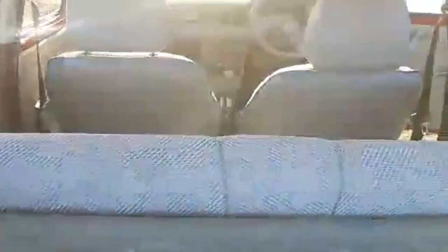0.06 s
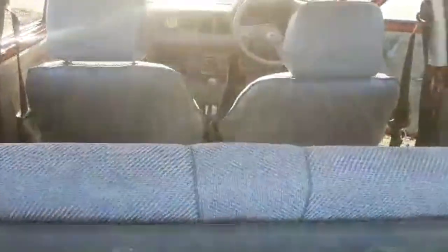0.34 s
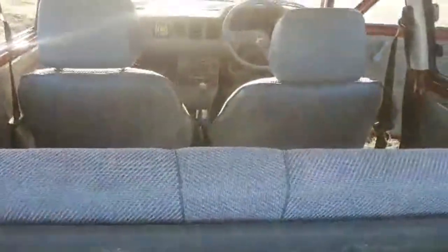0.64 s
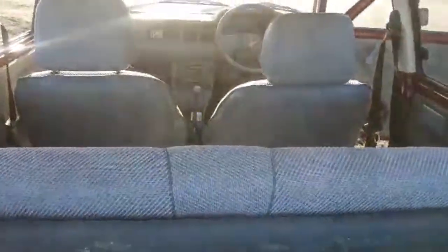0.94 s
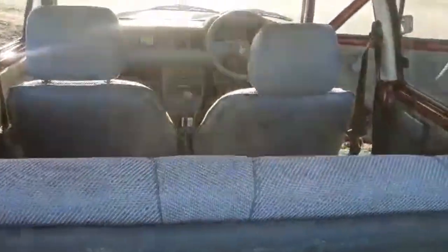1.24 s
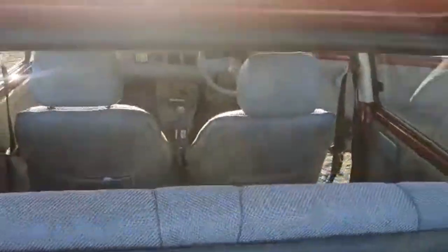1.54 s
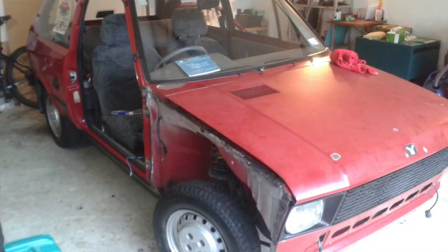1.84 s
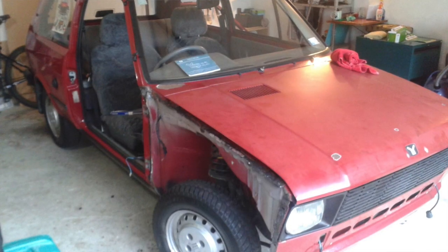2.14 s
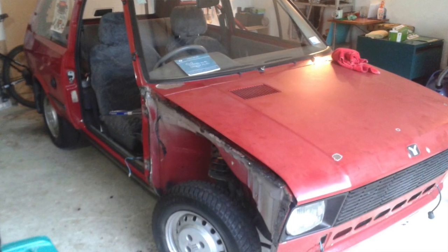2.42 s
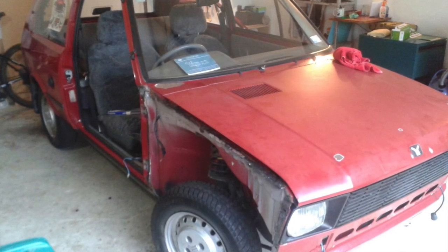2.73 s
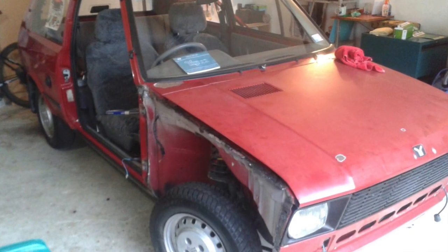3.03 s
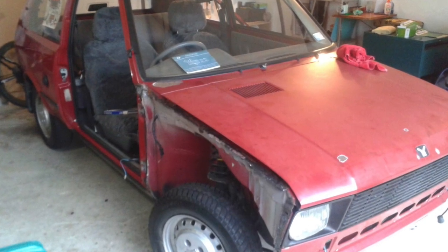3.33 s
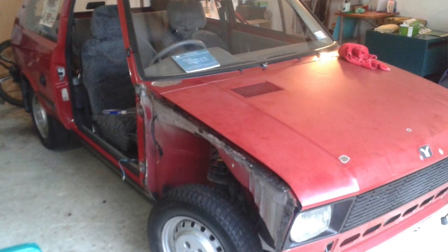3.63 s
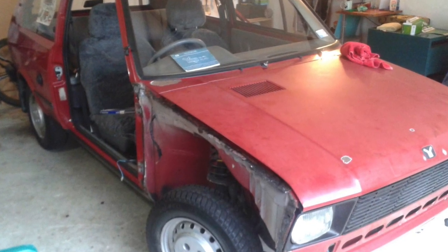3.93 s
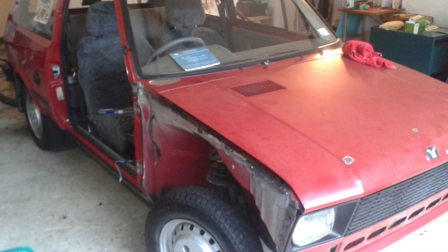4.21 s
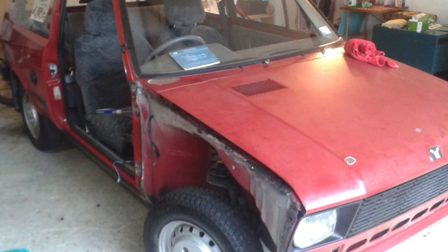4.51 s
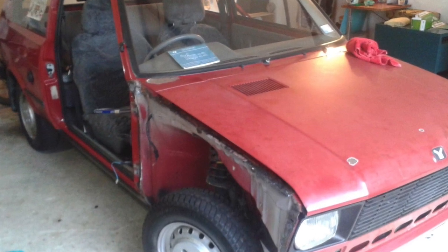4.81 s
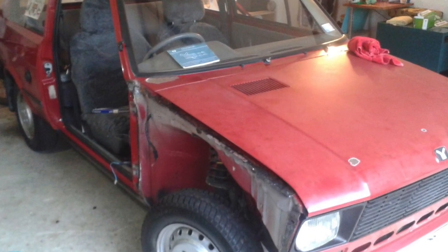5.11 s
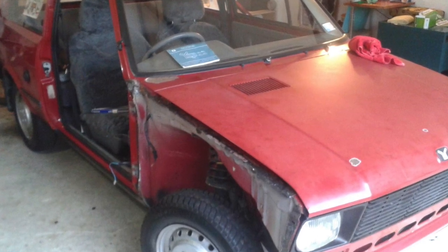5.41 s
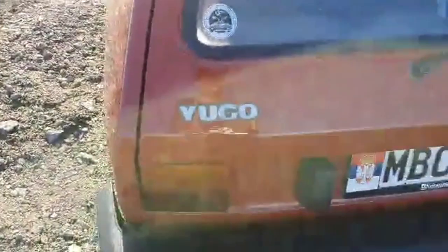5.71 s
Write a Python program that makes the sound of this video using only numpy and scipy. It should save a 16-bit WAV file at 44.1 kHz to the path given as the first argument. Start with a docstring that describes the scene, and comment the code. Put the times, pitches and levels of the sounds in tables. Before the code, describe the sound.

Wind rumbles low on a close hand-held microphone outdoors. Clothes rustle faintly, a finger taps the camera and a metal hinge gives a few light clicks. Shoes shift and crunch on gravel. Then a car hatch swishes down and slams with a loud, deep thump, a sharp latch clack and a quick rattle. Afterwards the wind is quieter, with a few small handling ticks.

```python
"""Hatchback tailgate slammed on gravel

Wind rumbles on a hand-held camera's microphone. Clothes rustle, fittings tick, a finger taps the camera,
the hinge clicks and shoes shift on the grit. The hatch swishes down, the latch strikes, the lid lands
on its seal, the cabin booms and the hatch chatters three times against the catch.
The blow ducks the automatic gain, so the wind is quieter afterwards."""
import sys
import numpy as np
from scipy import signal
from scipy.fft import rfft, irfft, next_fast_len
from scipy.io import wavfile
from scipy.ndimage import uniform_filter1d

SR = 44100
rng = np.random.default_rng(int(sys.argv[2]) if len(sys.argv) > 2 else 0)


def waveform_to_disk(signal):
    """Save audio, clipped to [-1, 1], as 16-bit WAV at the path in sys.argv[1]."""
    frames = np.transpose(np.atleast_2d(signal))
    scaled = np.clip(frames, -1, 1) * 32767
    samples = np.round(scaled).astype(np.int16)
    wavfile.write(sys.argv[1], SR, samples)


N = 253843
TIME = np.arange(N) / SR
SWING_START_S, SWING_END_S = 3.88, 4.33   # the hatch falls between these times

# stereo image, mono in the bass and wide on top: (frequency [Hz], left-right correlation [0..1])
STEREO_LIKENESS = [(60, 1), (200, 0.97), (370, .8), (670, 0.42), (1300, 0.095), (2800, .02), (13000, 0.034)]
# tone of rubbing cloth: (frequency [Hz], level [dB])
CLOTH_COLOUR = [(290, -35.5), (500, -3), (622, -5), (904, -6), (1170, -8), (1260, -6.5), (1990, -6.5),
                (3180, -18.5), (6000, -21.5), (7800, -57), (13200, -120)]
# tone of small hard parts: (frequency [Hz], level [dB])
FITTING_COLOUR = [(120, -46), (200, -1), (527, -5), (711, 3), (1440, 6.5), (1840, -5), (2490, 9),
                  (4140, -12), (5900, -11), (6550, -26), (7680, -19), (8540, -29), (9830, -9), (12400, -3),
                  (13500, -20)]
# tone of a struck shell, car or camera body: (frequency [Hz], level [dB])
BODY_COLOUR = [(140, -29), (230, 0.5), (287, -6), (425, -9), (479, -12.5), (673, -7), (979, -12.5),
               (1120, -12), (1500, -20.5), (2720, -21.5), (3120, -27), (5290, -29), (9440, -38.5),
               (12400, -37), (13500, -46.5)]


def from_db(db):
    """Decibels to gain."""
    return 10 ** (np.asarray(db) / 20)


def unit_rms(x):
    """Scale to unit power."""
    return x / np.sqrt(np.mean(x ** 2) + 1e-20)


def at_hz(curve, hz):
    """Read a curve on a log-frequency axis."""
    knots_hz, values = np.transpose(curve)
    return np.interp(np.log(hz), np.log(knots_hz), values)


def panned(left_db):
    """Stereo gains with the left side this much louder than the right."""
    return from_db(np.array([[left_db], [-left_db]]) / 2)


def noise(colour, low_hz, high_hz, grain_db=0, resonances=(), resonant_db=0):
    """A band of coloured stereo noise, roughened into sub-millisecond grains, with optional resonances."""
    size = next_fast_len(N, True)
    grains = np.repeat(rng.standard_normal(size // 32 + 1).clip(-2.5, 2.5), 32)[:size]
    mid, side = rfft(rng.standard_normal((2, size)) * from_db(grain_db * grains))
    hz = np.maximum(np.arange(len(mid)) * SR / size, 1)
    band = 1 / np.sqrt((1 + (low_hz / hz) ** 10) * (1 + (hz / high_hz) ** 10))
    peaks = np.zeros(len(hz))
    for centre, width, db in resonances:
        peaks += from_db(2 * db) / (1 + (2 * (hz - centre) / width) ** 2)
    broad = unit_rms(band * from_db(at_hz(colour, hz)))
    resonant = from_db(resonant_db) * unit_rms(band * np.sqrt(peaks))
    alike = at_hz(STEREO_LIKENESS, hz)
    stereo = np.sqrt(1 + alike) * mid + np.sqrt(1 - alike) * side * [[1], [-1]]
    return unit_rms(irfft(np.hypot(broad, resonant) * stereo, size)[:, :N])


def ring(force, hz, t60):
    """One mode: a unit click starts a decaying sine of height 1."""
    radius, angle = from_db(-60 / (t60 * SR)), 2 * np.pi * hz / SR
    return signal.lfilter([0, np.sin(angle)], [1, -2 * radius * np.cos(angle), radius ** 2], force + 1e-18)


def bursts(times, level_db, t60, texture, rise_s, tail_db, tail_t60):
    """Shape a noise texture into hits: quick attack, main decay and a weaker tail."""
    power, t = np.zeros(N), TIME[:SR]
    for start, db, hit_t60 in np.broadcast(times, level_db, t60):
        at = round(start * SR)
        attack = 1 - np.exp(-(t / rise_s) ** 2)
        decay = from_db(-120 * t / hit_t60) + from_db(2 * tail_db - 120 * t / tail_t60)
        power[at:at + SR] += (attack * decay * from_db(db) ** 2)[:N - at]
    return np.sqrt(power) * texture


def clink(times, level_db, modes):
    """Sharp contacts ring a small steel part; alternate modes flip polarity on the right."""
    clicks = np.zeros(N)
    clicks[np.round(times * SR).astype(int)] = from_db(level_db)
    return sum(from_db(db) * ring(clicks, hz, t60) * [[1], [0.75 * (-1) ** k]]
               for k, (hz, db, t60) in enumerate(modes))


def hatch_speed(rise_db_per_s=26, fade_s=0.04):
    """Envelope of the fall: it grows to 1 as the hatch lands, then fades quickly."""
    gate = np.clip(np.minimum(TIME - SWING_START_S, SWING_END_S + fade_s - TIME) / fade_s, 0, 1)
    return gate * from_db(rise_db_per_s * np.minimum(TIME - SWING_END_S, 0))


def wind(steady_db=-40, draught_db=-36):
    """A bed of rumble on the microphone, swelling in the draught of the falling hatch."""
    # tone of the buffeting: (frequency [Hz], level [dB])
    wind_colour = [(13, -35), (22, -9), (53, -0.5), (75, -1), (102, -7), (120, -7.5), (171, -16),
                   (264, -25.5), (484, -29.5), (900, -39.5), (1170, -70.5), (1980, -120)]
    level = np.hypot(from_db(steady_db), from_db(draught_db) * hatch_speed())
    return level * noise(wind_colour, 18, 900) * panned(-0.3)


def shuffle():
    """Cloth rubs and fine grit trickles as the person moves and pulls the hatch down."""
    # swells of movement: (peak time [s], rub level [dB], grit level [dB], rise [s], fall [s])
    rustles = [(0.02, -79, -79.5, 0.063, 0.2), (1.28, -60.5, -76.5, 0.17, 0.16),
               (1.72, -61.5, -70.5, 0.13, 0.13), (2.32, -56, -63.5, 0.12, 0.16),
               (2.88, -61, -68.5, 0.19, 0.15), (3.7, -60.5, -75.5, 0.084, 0.34),
               (4.89, -52.5, -71, 0.026, 0.12), (5.04, -54, -60, 0.054, 0.12),
               (5.55, -64.5, -72.5, .2, .25)]
    # tone of fine grit: (frequency [Hz], level [dB])
    grit_colour = [(1760, -28), (3000, -2.5), (3170, -5.5), (4780, -11.5), (6840, -7), (8860, -14),
                   (10500, -9), (12200, -6.5), (13100, -13), (13500, -26.5)]
    pull = hatch_speed()
    rub = np.hypot(from_db(-65), from_db(-52.5) * pull)   # a faint floor plus the pulling arm
    grit = np.hypot(from_db(-82.5), from_db(-65.5) * pull)
    for peak_s, rub_db, grit_db, rise_s, fall_s in rustles:
        swell = np.exp(-0.5 * ((TIME - peak_s) / np.where(TIME < peak_s, rise_s, fall_s)) ** 2)
        rub = np.hypot(rub, from_db(rub_db) * swell)
        grit = np.hypot(grit, from_db(grit_db) * swell)
    rubbing = from_db(-0.86) * rub * noise(CLOTH_COLOUR, 650, 4460, grain_db=2)
    trickle = grit * noise(grit_colour, 3800, 17000, grain_db=2.5)
    return (rubbing + trickle + crackle(rub)) * panned(0.77)


def crackle(rub, per_second=9, t60=0.022):
    """Folds and grains catch at random, louder when the rubbing is stronger."""
    gaps, sizes = rng.standard_exponential((80, 2)).T
    times = np.cumsum(gaps) / per_second
    heard = times < TIME[-2]
    rub_db = 20 * np.log10(np.interp(times, TIME, rub))
    db = rub_db + 3 + 1.4 * np.minimum(sizes, 2)
    crisp = noise(CLOTH_COLOUR, 800, 6000, grain_db=3)
    return bursts(times[heard], db[heard], t60, crisp, rise_s=0.0013, tail_db=-14.5, tail_t60=0.08)


def fittings():
    """Small hard parts tick and rattle under the hand: knock, clack and ping with a snap on top."""
    # handling ticks: (time [s], base level [dB], brightness [dB], base t60 [s])
    ticks = [(0.644, -53, -20, 0.15), (1.192, -60, -8, 0.049), (1.248, -58.5, -3.5, 0.041),
             (1.618, -57.5, -6.5, 0.18), (1.743, -52.5, -13.5, 0.043), (4.884, -40.5, -23, 0.044),
             (4.985, -47, -17, .06), (5.101, -53.5, 14, 0.027), (5.12, -42, 5.5, 0.03),
             (5.132, -43.5, 3.5, 0.14), (5.167, -39.5, -5.5, 0.054), (5.179, -42, -13, 0.046),
             (5.609, -59, -4.5, 0.048), (5.704, -56, -11, 0.045)]
    times, db, bright_db, t60 = np.transpose(ticks)
    dull = noise(FITTING_COLOUR, 260, 580)
    hard = noise(FITTING_COLOUR, 550, 1940, grain_db=3)
    sharp = noise(FITTING_COLOUR, 3970, 9900, grain_db=5)
    narrow = noise(FITTING_COLOUR, 2500, 2500, grain_db=1)
    knock = bursts(times, db - 7, t60, dull, rise_s=0.0015, tail_db=-23, tail_t60=0.28)
    clack = bursts(times, db + 4, 1.09 * t60, hard, rise_s=0.00085, tail_db=-9.5, tail_t60=0.057)
    snap = bursts(times, db + bright_db + 5.5, t60, sharp, rise_s=0.0024, tail_db=-14.5, tail_t60=0.066)
    ping_db = db + 0.55 * bright_db - 0.5
    ping = bursts(times, ping_db, t60, narrow, rise_s=0.001, tail_db=-12, tail_t60=0.08)
    return (knock + clack + ping + snap) * panned(1.7)


def finger_tap(at_s=1.17, level_db=-37.5, t60=0.025):
    """A finger taps the camera body: one dry tick on the right."""
    shell = noise(BODY_COLOUR, 220, 5600)
    return bursts(at_s, level_db, t60, shell, rise_s=0.00079, tail_db=-32, tail_t60=0.2) * panned(-11)


def hinge():
    """The steel hinge slips and snaps as it starts to move, ringing briefly in its own resonances."""
    # hinge clicks: (time [s], base level [dB], brightness [dB])
    slips = [(1.396, -50.5, -4), (1.4134, -49, 1.5), (1.4328, -44, 8), (1.4413, -53.5, 6),
             (1.498, -55, -18), (1.557, -56.5, 10)]
    # peaks in the click noise: (frequency [Hz], width [Hz], level [dB])
    peaks = [(1930, 150, 23), (4450, 23, 4), (5140, 33, -29), (6460, 61, -3), (7500, 220, -7),
             (9360, 270, -6.5), (12200, 34, -11)]
    # partials of the clink: (frequency [Hz], level [dB], t60 [s])
    hinge_modes = [(4200, -2, 0.043), (2150, -9, 0.063), (4460, -2.5, 0.039), (10100, -7, .04),
                   (6980, -7, 0.04)]
    times, db, bright_db = np.transpose(slips)
    top_db = db + bright_db
    low = noise(FITTING_COLOUR, 2400, 2600, grain_db=-1.5, resonances=peaks, resonant_db=1)
    high = noise(FITTING_COLOUR, 5200, 16000, grain_db=1.5, resonances=peaks, resonant_db=6)
    ping = bursts(times, db + 3, t60=0.057, texture=low, rise_s=0.0012, tail_db=-13, tail_t60=0.1)
    snap = bursts(times, top_db + 3.5, t60=0.0255, texture=high,
                  rise_s=0.0008, tail_db=-13.5, tail_t60=0.08)
    return ping + snap + clink(times, top_db - 4, hinge_modes)


def footsteps(sole_delay_s=0.0317):
    """Heel, then softer sole, land with a hollow knock and a stony crunch; only the heel throws grit."""
    # heel strikes: (time [s], base level [dB], tread offset [dB], grit offset [dB], base t60 [s])
    heels = [(2.149, -53.5, 11, -13, 0.051), (2.174, -47, 0.5, -21, 0.059), (2.326, -45, 1.5, -3, 0.17),
             (2.366, -42, -10, -22, 0.066), (2.464, -42.5, 1.5, -9.5, 0.16), (2.516, -36, 1, -3.5, 0.1),
             (2.56, -45, 10.5, -31, 0.076), (2.645, -53.5, 14, -18, 0.12), (2.661, -42.5, -13, -17.5, .08),
             (2.7, -46, 7.5, -20, 0.37), (2.88, -43.5, -4.5, -27, 0.051), (2.938, -53.5, 8.5, -12, 0.07),
             (3.026, -47, 4.5, -6, 0.084), (3.579, -49, -9.5, -17, 0.41)]
    # tone of a shoe on gravel: (frequency [Hz], level [dB])
    step_colour = [(110, -0.5), (180, 8), (220, -11), (299, 1), (391, -14.5), (542, -8), (604, -13),
                   (1880, -15.5), (4020, -31.5), (4570, -28), (9580, -34.5), (12600, -27), (13500, -64)]
    # resonances of the stones: (frequency [Hz], width [Hz], level [dB])
    stone_peaks = [(920, 160, -1.5), (1330, 180, -4), (1622, 24, -8), (1890, 83, -6), (2634, 58, -5.5),
                   (2930, 21, -5), (2800, 7.3, -4.5), (3650, 50, 2)]
    heel_s, db, tread_offset, grit_offset, heel_t60 = np.transpose(heels)
    times, t60 = np.r_[heel_s, heel_s + sole_delay_s], np.r_[heel_t60, heel_t60]
    tread_db = np.r_[db + tread_offset, db + tread_offset - 4.5]
    crunch_db = np.r_[db + 2, db - 10]
    grit_db = db + grit_offset + 2.5
    hollow = noise(step_colour, 229, 765)
    stony = noise(step_colour, 510, 2460, grain_db=4.5, resonances=stone_peaks, resonant_db=3.5)
    sandy = noise(step_colour, 2700, 11700)
    tread = bursts(times, tread_db, 1.5 * t60, hollow, rise_s=0.0022, tail_db=-12.5, tail_t60=0.52)
    crunch = bursts(times, crunch_db, 1.03 * t60, stony, rise_s=0.0033, tail_db=-23, tail_t60=0.58)
    grit = bursts(heel_s, grit_db, 0.96 * heel_t60, sandy, rise_s=0.003, tail_db=-37, tail_t60=0.18)
    return tread * panned(0.8) + (crunch + grit) * panned(3.1)


def slide():
    """A thin, bright hiss starts on a footstep and dies away as something slides to rest."""
    # fade of the hiss: (time [s], relative level [dB])
    fade = [(2.71, -55), (2.948, -68.5), (3.062, -70), (3.25, -73)]
    # tone of the hiss: (frequency [Hz], level [dB])
    slide_colour = [(3240, -41), (5500, -17), (7500, -6), (8920, -15), (9020, -4), (9720, 1), (10600, -5.5),
                    (12300, -2), (13300, -24)]
    times, db = np.transpose(fade)
    level = from_db(np.interp(TIME, times, db) + 2)
    gate = np.interp(TIME, [2.69, 2.705, 3.15, 3.4], [0, 1, 1, 0])
    return level * gate * noise(slide_colour, 6200, 13300, grain_db=1.5)


def swing(base_db=-40.5, cushion_db=7.5, cushion_s=0.013):
    """The struts swish louder as the hatch gathers speed, and trapped air rushes out as it lands."""
    # tone of the swish: (frequency [Hz], level [dB])
    swish_colour = [(88, -30), (150, 5), (227, -2), (389, -2), (556, -13.5), (601, -9.5), (728, -1.5),
                    (963, -23.5), (1170, -22), (1270, -30), (1500, -18), (1950, -58), (3300, -120)]
    rush_db = cushion_db * np.exp(np.minimum(TIME - SWING_END_S, 0) / cushion_s)
    return from_db(base_db + rush_db) * hatch_speed() * noise(swish_colour, 230, 1100)


def contacts(rebound_s=4.4385, gap_s=0.0532):
    """The closing hits, three evenly spaced, dying rebounds and a click of the catch among them."""
    # the latch strikes, the lid lands and hits its stops:
    # (time [s], base level [dB], panel offset [dB], latch offset [dB], base t60 [s])
    impacts = [(4.33, -16, 5.4, 7.5, 0.05), (4.34, -19, 4, -1.5, 0.15), (4.353, -11, 8.4, 0, .08),
               (4.361, -20.5, 5, 1, 0.079), (4.377, -11, 4, -9, 0.055)]
    rebounds = [(rebound_s + k * gap_s, -18.5 - 3.5 * k ** 2, 4.5, -11.5, 0.076) for k in range(3)]
    catch = (4.479, -26, 4.5, -13, 0.02888)
    return np.vstack([impacts, rebounds, catch])


def slam():
    """Each contact crashes through panel, trim, sheet metal and latch; the first rings the latch."""
    # peaks in the latch's clash: (frequency [Hz], width [Hz], level [dB])
    latch_peaks = [(3540, 65, 5.5), (4700, 79, 0.5), (5400, 67, -4), (6070, 130, 6), (9600, 88, -9),
                   (10700, 51, -4.5), (10900, 410, -6), (11500, 69, -3.5), (11200, 290, -3),
                   (12500, 150, -5.5)]
    # partials of the latch as it meets the catch: (frequency [Hz], level [dB], t60 [s])
    latch_modes = [(3905, -0.5, .055), (2765, -8.5, .07), (7250, -1.5, .05), (6430, -7, 0.065),
                   (9680, -2, 0.024), (9050, -5.5, .04), (12100, -3, .045), (4240, -3, .04)]
    times, db, panel_offset, latch_offset, t60 = contacts().T
    sheet_db = db + 1.5 + 0.85 * np.minimum(latch_offset, 0)   # weakens with the latch in soft contacts
    latch_db = db + latch_offset + 2.5
    steel = noise(BODY_COLOUR, 4100, 18000, grain_db=2, resonances=latch_peaks, resonant_db=-6)
    thud = noise(BODY_COLOUR, 90, 630)
    clack = noise(BODY_COLOUR, 760, 1500, grain_db=-1)
    clatter = noise(BODY_COLOUR, 1500, 2800, grain_db=3)
    panel = bursts(times, db + panel_offset, 1.28 * t60, thud, rise_s=0.0019, tail_db=-17.5, tail_t60=0.4)
    trim = bursts(times, db + 4.5, 0.73 * t60, clack, rise_s=0.0023, tail_db=-18, tail_t60=0.3)
    sheet = bursts(times, sheet_db, 1.2 * t60, clatter, rise_s=0.003, tail_db=-23.5, tail_t60=0.45)
    latch = bursts(times, latch_db, 0.65 * t60, steel, rise_s=0.00086, tail_db=-29.5, tail_t60=0.31)
    crash = panel * panned(-1.5) + trim * panned(4.5) + (sheet + latch) * panned(2.4)
    ping = clink(times[:1], level_db=-17, modes=latch_modes)
    return crash + ping + hatch_ring(times, db + 26)


def hatch_ring(times, contact_db, t60_at_1k=0.26, spread_db=1):
    """The contacts strike each mode of the hatch with a strength of their own; low modes ring longer."""
    # partials of the hatch: (frequency [Hz], level [dB])
    hatch_modes = [(290.7, -38.5), (333.8, -47.5), (398.4, -44), (522.2, -48.5), (592.2, -49),
                   (678.3, -45.5), (759.0, -46.5), (796.7, -49), (823.6, -46), (942.1, -54), (1039, -49),
                   (1093, -53.5), (1157, -51.5), (1572, -57.5), (1593, -58.5), (1685, -61.5), (1820, -57.5),
                   (1890, -62), (1949, -60.5), (2315, -58.5), (2482, -63.5), (2632, -59.5), (2702, -65.5),
                   (2837, -65)]
    at = np.round(times * SR).astype(int)
    ringing = np.zeros((2, N))
    for hz, db in hatch_modes:
        clicks = np.zeros(N)
        strength_db = contact_db + db + spread_db * rng.standard_normal(len(at))
        clicks[at] = from_db(strength_db) * rng.choice([-1, 1], len(at))
        width = np.sqrt(1 - at_hz(STEREO_LIKENESS, hz))   # higher modes scatter wider
        pan = np.pi / 4 * (1 + width * rng.uniform(-1, 1))
        ringing += ring(clicks, hz, t60_at_1k * (1000 / hz) ** 0.25) * [[np.cos(pan)], [np.sin(pan)]]
    return ringing


def cabin_boom():
    """The lid squeezes its seal in soft pushes that rock the cabin air and the large panels."""
    # pushes on the seal: (time [s], level [dB], length [s])
    pushes = [(4.351, -1, 0.0042), (4.374, -1, 0.0069), (4.393, -9, 0.004), (4.455, -12, 0.0064),
              (4.498, -13.5, 0.0047), (4.548, -20.5, 0.0072)]
    # modes of the cabin air and large panels: (frequency [Hz], level [dB], t60 [s])
    cabin_modes = [(43.7, 4, 0.14), (62, -9.5, 0.27), (94.9, -10.5, 0.48), (125.4, -14, 0.16),
                   (157, -10.5, 0.26), (188, -7.5, 0.22), (280, -11, 0.3)]
    force = np.zeros(N)
    for start, db, length in pushes:
        push = np.sin(np.pi * np.clip((TIME - start) / length, 0, 1)) ** 2
        force -= from_db(db) * push / push.sum()
    return sum(from_db(db) * ring(force, hz, t60) for hz, db, t60 in cabin_modes) * panned(-1.6)


def gain_control(x, threshold_db=-19, max_cut_db=7):
    """A loud sound ducks the gain at once, and it stays down."""
    power = uniform_filter1d(np.mean(x ** 2, axis=0), size=300)
    level_db = 10 * np.log10(np.abs(power) + 1e-12)
    cut_db = np.maximum.accumulate(np.clip(level_db - threshold_db, 0, max_cut_db))
    return x * from_db(-cut_db)


def scene():
    """All sources at the microphone."""
    foley = wind() + shuffle() + hinge() + fittings() + finger_tap() + footsteps() + slide()
    return foley + swing() + slam() + cabin_boom()


def record(dry):
    """The deepest bass rolls off, the gain ducks, peaks clip at full scale and the top is cut."""
    low_cut = signal.butter(2, 21, "high", fs=SR, output="sos")
    high_cut = signal.ellip(10, 0.2, 80, 13400, fs=SR, output="sos")
    ducked = gain_control(signal.sosfilt(low_cut, dry))
    return signal.sosfilt(high_cut, np.clip(ducked, -1, 1))


dry = scene()
out = record(dry)
waveform_to_disk(out)
```